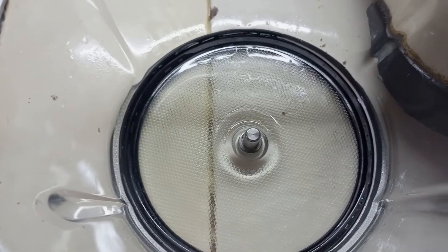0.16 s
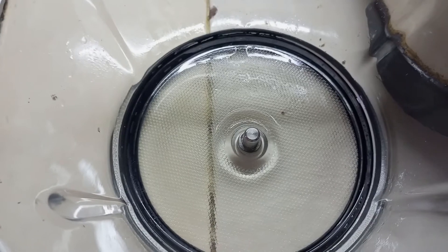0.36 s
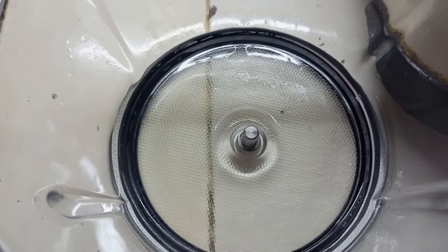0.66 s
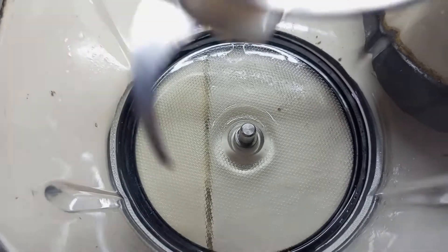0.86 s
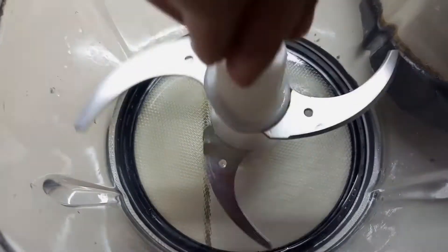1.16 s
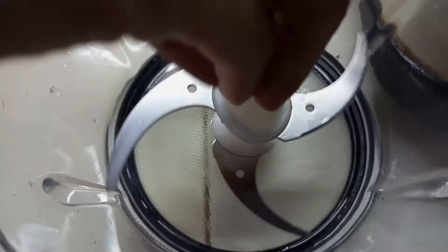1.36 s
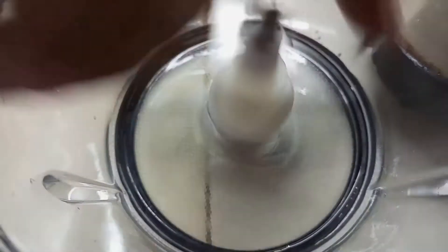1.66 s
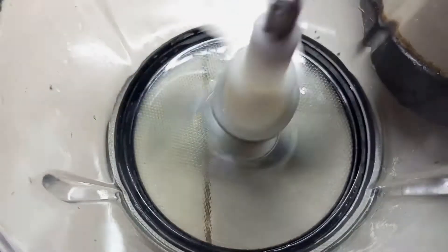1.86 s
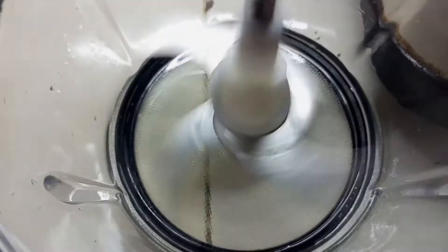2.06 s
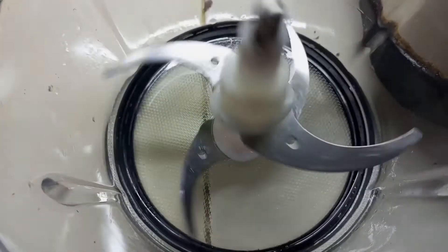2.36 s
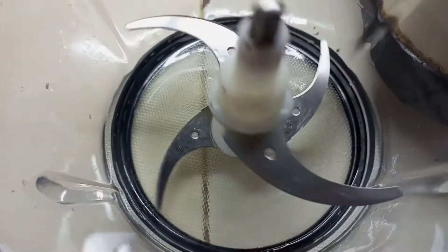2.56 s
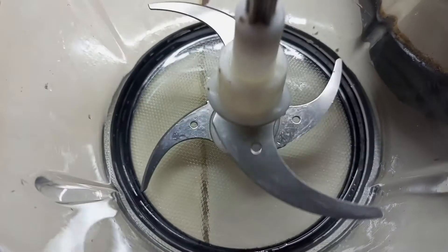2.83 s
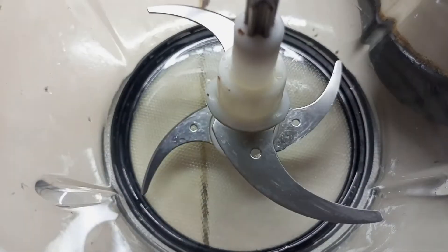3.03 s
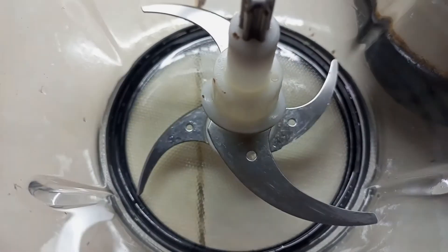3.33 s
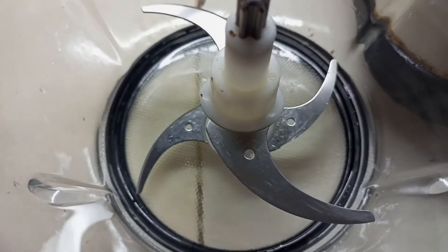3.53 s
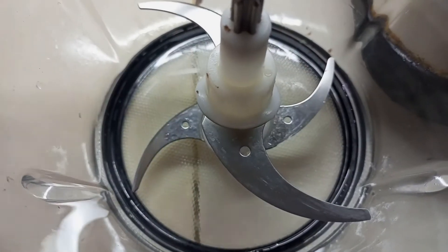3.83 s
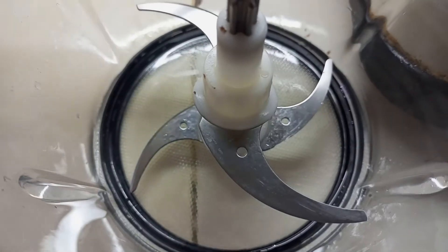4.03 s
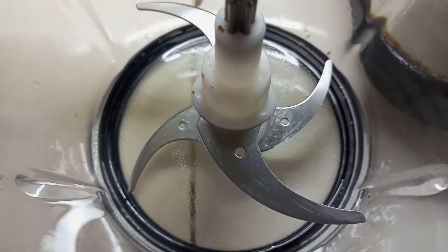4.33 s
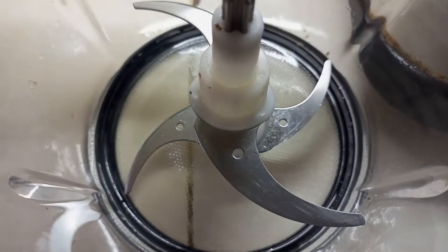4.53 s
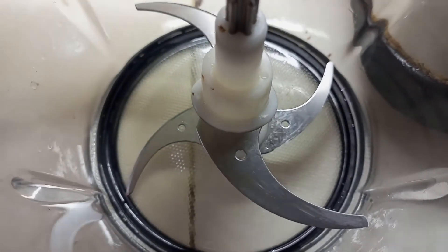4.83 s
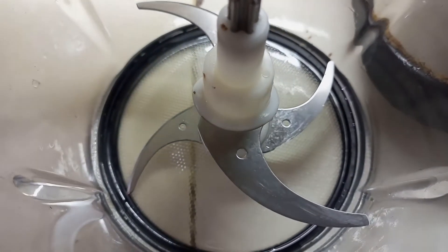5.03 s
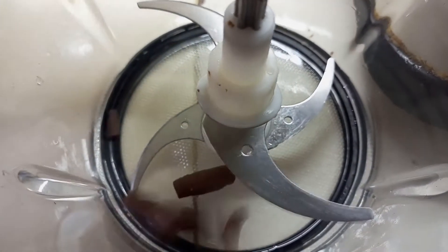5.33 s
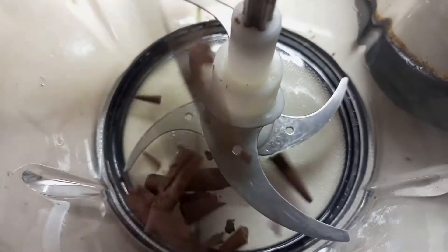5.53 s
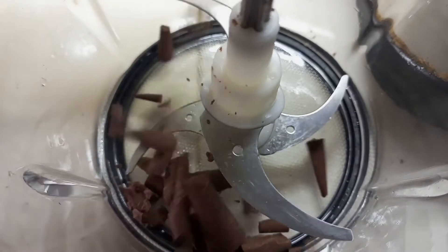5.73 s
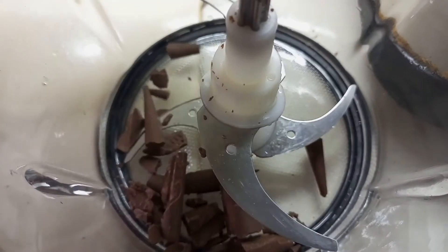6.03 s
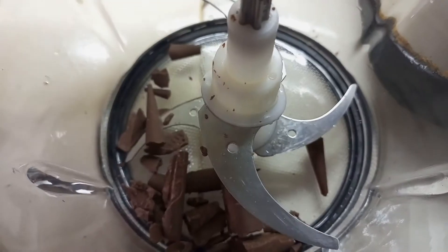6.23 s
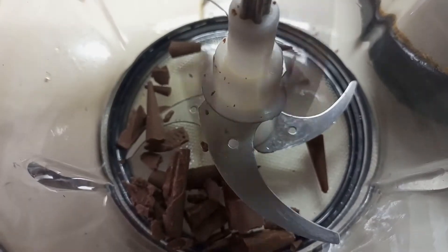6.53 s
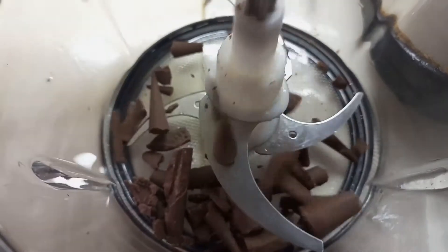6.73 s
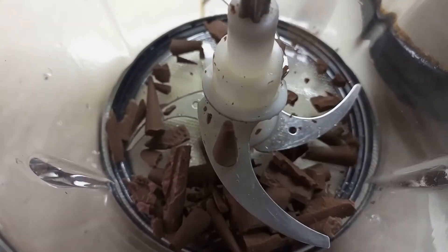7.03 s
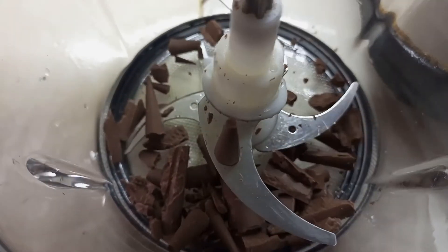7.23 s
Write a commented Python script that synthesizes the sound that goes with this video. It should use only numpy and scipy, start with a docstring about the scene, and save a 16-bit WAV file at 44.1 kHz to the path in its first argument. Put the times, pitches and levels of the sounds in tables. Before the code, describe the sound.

A soft, steady low hum lies under everything, close up in a slightly echoing kitchen. In the first 0.3 s there are faint dull ticks and a scrape, then near quiet. Around 1.5 s a very thin, faint squeak, and at 1.67 s a light plastic click as the blade seats, with small ticks after 2.2 s. From 2.7 to 3.6 s chocolate pieces tick, rub and knock in a glass dish, with bright short clinks. A brief soft shuffle near 3.9 s, then busier clinking from 4.2 to 4.8 s. At 4.92 s a very loud, hard clatter lands in the plastic bowl, crumbs pattering away. More sharp ticks and a ringing clink lead to a second, lesser blow at 5.53 s. Sparse ticks and a knock at 6.0 s. At 6.6 s a scrape and low microphone thump, then at 6.78 s another very loud spill, crunchy, hissing, with muffled bumps until 7.05 s. A few last small clicks.

```python
"""Chocolate pieces into a chopper bowl

Pieces from a glass dish tick as pitched noise bursts; ticks, knocks and touches ring the dish's modes.
Landings are noise bursts that ring the modes of a plastic bowl; pieces rub, scrape and patter as random
grains, with airy hiss above. Microphone thumps are slowing swings, hand rumble is low noise, a squeak is
a sine. Feedback delays add the kitchen's echo; steady noise, strongest near 95 Hz, lies below."""
import sys
import numpy as np
from scipy import signal
from scipy.fft import rfft, irfft, next_fast_len
from scipy.io import wavfile

SR = 44100
rng = np.random.default_rng(int(sys.argv[2]) if len(sys.argv) > 2 else 0)


def unload_audio(sound):
    """Save the sound as a 16-bit wav file, at the path given as the first command line argument."""
    columns = np.transpose(np.atleast_2d(sound))
    # keep every value between -1 and 1, then stretch to whole-number steps
    steps = np.round(np.clip(columns, -1, 1) * 32767)
    wavfile.write(sys.argv[1], SR, steps.astype(np.int16))


def linear_from_db(decibels):
    """Turn decibels (scalar or array-like) into linear amplitude factors; 0 gives 1."""
    return 10 ** (np.asarray(decibels, float) / 20)


N = 325458


def rms_one(x):
    """Scale to unit rms."""
    return x / np.sqrt(np.mean(x ** 2) + 1e-20)


def band(x, low_hz, high_hz):
    """Butterworth band-pass."""
    sos = signal.butter(2, [low_hz, min(high_hz, .45 * SR)], "band", fs=SR, output="sos")
    return signal.sosfilt(sos, x + 1e-18)


def shaped(x, spectrum):
    """x filtered by a spectrum of (Hz, dB per Hz); rms 1."""
    hz, db = np.transpose(spectrum)
    size = next_fast_len(N)
    log_hz = np.log(np.arange(size // 2 + 1) * SR / size + 1)
    gain = linear_from_db(np.interp(log_hz, np.log(hz), db, left=-80, right=-80))
    return rms_one(irfft(rfft(x, size) * gain, size)[:N])


def drift(rate_hz):
    """Slow random curve of rms 1: noise through two equal poles at rate_hz."""
    step = 40  # samples between drawn points
    r = np.exp(-2 * np.pi * rate_hz * step / SR)
    noise = rng.standard_normal(N // step + 2002)
    slow = signal.lfilter([1], [1, -2 * r, r * r], noise)[2000:]
    return np.interp(np.arange(N) / step, np.arange(len(slow)), rms_one(slow))


def ring(x, hz, t60_s):
    """Two-pole resonator: a unit click starts a decaying sine of height 1."""
    r = linear_from_db(-60 / (max(t60_s, .002) * SR))
    w = 2 * np.pi * hz / SR
    return signal.lfilter([0, np.sin(w)], [1, -2 * r * np.cos(w), r * r], x + 1e-18)


def clicks(start_s, sizes):
    """Impulses at the given moments."""
    out = np.zeros(N)
    np.add.at(out, np.round(np.asarray(start_s) * SR).astype(int), sizes)
    return out


def bursts(start_s, levels_db, t60s_s):
    """White noise that starts at once and dies away, one burst a contact."""
    envelope = np.zeros(N)
    for start, level_db, t60_s in zip(start_s, levels_db, t60s_s):
        i = round(start * SR)
        t = np.arange(int(0.99 * abs(t60_s) * SR) + 9) / SR
        envelope[i:i + len(t)] += linear_from_db(level_db - 60 * t / (abs(t60_s) + 1e-4))[:N - i]
    return envelope * rng.standard_normal(N)


def grains(per_s, spread_db):
    """Random tiny impulses of uneven size on a bed of noise."""
    sizes = linear_from_db(spread_db * np.minimum(rng.exponential(1, N), 5)) * rng.choice([-1, 1], N)
    return sizes * (rng.random(N) < per_s / SR) + .15 * rng.standard_normal(N)


def coloured(x, spectrum, patchy_db, rate_hz):
    """Half-octave bands that flicker each on its own, then the spectrum."""
    low_hz, high_hz = spectrum[0][0], spectrum[-1][0]
    edges = low_hz * 2 ** np.arange(0, np.log2(high_hz / low_hz) + .5, .5)
    flicker = sum(linear_from_db(patchy_db * drift(rate_hz)) * band(x, low, high) for low, high in zip(edges, edges[1:]))
    return shaped(flicker, spectrum)


def gains(curves, column):
    """One column of several level curves as a gain in time, near silent between them."""
    t = np.arange(N) / SR
    total = 0
    for rows in curves:
        s, db = np.transpose(rows)[[0, column]]
        total = total + linear_from_db(np.interp(t, s, db, left=-120, right=-120))
    return total


# Dry ticks of pieces. Each row: start in seconds, burst level in dB before filtering, pitch in Hz.
TICK_ROWS = [(0.075, -37.5, 2150), (0.105, -39.5, 327), (0.115, -39.5, 860), (0.144, -42, 1640),
             (0.246, -38, 1450), (0.741, -43, 2300), (1.012, -47, 5530), (1.673, -21.5, 4060),
             (2.188, -28.5, 3944), (2.737, -27, 2670), (2.817, -41, 6230), (2.859, -29, 5400),
             (2.874, -17.5, 4420), (2.936, -43, 6200), (2.952, -33.5, 2930), (2.983, -28.5, 5110),
             (3.016, -25.5, 4510), (3.1, -38.5, 4200), (3.134, -27, 4630), (3.155, -31.5, 6100),
             (3.174, -27.5, 6300), (3.251, -29.5, 4550), (3.286, -35.5, 2230), (3.334, -13, 6230),
             (3.458, -19, 4320), (3.466, -16.5, 3750), (3.505, -19, 3316), (3.549, -37.5, 6350),
             (3.857, -40, 2970), (3.866, -33.5, 2300), (3.916, -34.5, 2980), (3.934, -35, 1520),
             (4.177, -24, 5410), (4.201, -29, 6820), (4.241, -26, 4500), (4.297, -26.5, 3060),
             (4.315, -26, 3740), (4.354, -39.5, 3310), (4.377, -24.5, 6070), (4.388, -13.5, 5680),
             (4.463, -29, 5560), (4.498, -21.5, 5400), (4.54, -13.5, 5400), (4.624, -42, 5000),
             (4.681, -22.5, 1826), (4.714, -28.5, 4480), (4.787, -24.5, 3580), (4.817, -40, 5640),
             (5.144, -27.5, 2480), (5.351, -28, 3990), (5.41, -24.5, 5400), (5.42, -11, 3780),
             (5.446, -16.5, 5140), (5.466, -13.5, 3167), (5.605, -65, 4840), (5.66, -30, 4000),
             (5.725, -33.5, 3890), (5.811, -43, 3780), (5.942, -40, 4440), (6.005, -18, 3340),
             (6.1, -35, 3000), (6.451, -39, 4520), (6.545, -40.5, 5800), (6.581, -16.5, 5570),
             (6.675, -38.5, 6200), (6.882, -20.5, 3330), (7.184, -33.5, 6200), (7.203, -26.5, 5620),
             (7.223, -34.5, 6200), (7.276, -24.5, 2570), (7.312, -43.5, 6220)]
TICK_T60_S, TICK_T60_POWER = 0.051, -0.72  # t60 at 4 kHz; power of pitch by which it changes
SNAP_DB, SNAP_DB_PER_OCTAVE = -26.5, 4  # re burst at 4 kHz, before filtering; higher ticks snap more


def ticks():
    """A dry burst coloured around the pitch of the piece, its brief ping, a faint broad body and an airy snap."""
    length = 4000
    out, snap, t = np.zeros(N), np.zeros(N), np.arange(length) / SR
    for start_s, level_db, hz in TICK_ROWS:
        noise = rng.standard_normal(length)
        pitch = hz / 4000
        t60_s = TICK_T60_S * pitch ** TICK_T60_POWER
        burst = noise * linear_from_db(level_db - 60 * t / t60_s)
        core = linear_from_db(-1.5) * band(band(burst, hz / 1.31, hz * 1.32), hz / 1.34, hz * 1.2)
        ping = linear_from_db(-29.5) * ring(burst, hz, 0.042)
        body = linear_from_db(-6.5) * band(burst, hz / 2.7, hz * 1.55)
        snap_db = level_db + SNAP_DB + SNAP_DB_PER_OCTAVE * np.log2(pitch)
        i = round(start_s * SR)
        out[i:i + length] += (core + ping + body)[:N - i]
        snap[i:i + length] += (noise * linear_from_db(snap_db - 80 * t / t60_s))[:N - i]
    return out + band(snap, 7700, 12000) + linear_from_db(1.5) * band(snap, 14200, 15000)


# Dish modes in five groups struck together. Each row: frequency in Hz, mean level in dB, t60 in seconds.
DISH_MODES = [
    [(5990, -8.5, .15), (6154, -1, 0.093), (6230, 3.5, 0.073), (6380, -14.5, .15), (7280, -23, 0.16),
     (10050, -18, 0.028)],
    [(560, -18, 0.36), (663.4, 6.5, 0.032), (767, -3.5, 0.079)],
    [(748, 2.5, 0.44), (545, -18.5, 0.59)],
    [(1686, -3, .42), (1758, -5, .28), (2934, -18, .13), (3130, -6, .2)],
    [(4430, -4, 0.1), (4510, 6, 0.027), (4440, -1, 0.016)],
]
# Ticks ringing the two treble groups. Each row: group pitch in Hz, level in dB re tick burst,
# loss in dB per octave between tick and group.
TICK_TO_TREBLE = [(6200, -3.5, 40.5), (4500, -11.5, 23)]
# Dull knocks on the dish. Each row: start in seconds, level in dB.
DISH_KNOCKS = [(2.809, -32.5), (2.873, -21), (2.94, -35), (2.983, -50.5), (3.018, -27.5), (3.101, -40.5),
               (3.135, -32), (3.172, -33), (3.232, -31), (3.25, -30), (3.335, -24.5), (3.398, -44),
               (4.212, -39), (4.241, -38), (4.278, -35), (4.297, -22), (4.37, -30), (4.392, -21.5),
               (4.54, -35), (4.555, -33), (4.681, -35), (4.793, -26.5), (5.41, -35.5), (5.467, -34),
               (5.914, -41.5), (6.005, -22), (6.025, -34.5), (6.12, -44), (6.568, -32.5), (6.61, -34),
               (7.222, -36.5), (7.281, -45.5)]
# Touches that leave the dish free to ring; the spot struck favours one of the twins near 1.7 kHz.
# Each row: start in seconds, long low ring in dB, 1.7-3 kHz ring in dB,
# lean in dB (added to the upper twin, taken from the lower).
DISH_TOUCHES = [(2.978, -37, -32.5, 3), (3.172, -30, -33, 7), (3.25, -30.5, -48, 8), (3.347, -31, -43, 4),
                (4.278, -39, -47, 6), (4.37, -43, -38.5, 3), (4.42, -36.5, -48, 5), (4.555, -56, -44, 10),
                (4.681, -59, -49, 0), (4.817, -68, -48, 1.5), (5.445, -32.5, -19.5, -5),
                (5.467, -31.5, -35, -1), (5.526, -34, -24.5, 5), (6.12, -52, -48.5, 9.5),
                (6.61, -68, -42, 1), (6.675, -66, -33, 2), (7.281, -56, -46.5, 10.5), (7.315, -53, -48, -7)]
DISH_FROM_S = 2.5  # the dish comes into the hands; earlier ticks do not ring it


def dish():
    """Ticks, knocks and free touches strike mode groups; rounded contact lets each mode swell for a moment."""
    contact_t60_s = .005
    contact_gain = 2 * np.log(1000) / (contact_t60_s * SR)
    tick_s, tick_db, tick_hz = np.transpose([row for row in TICK_ROWS if row[0] > DISH_FROM_S])
    high, upper = ((tick_s, tick_db + db - loss_db * abs(np.log2(tick_hz / hz)), 0)
                   for hz, db, loss_db in TICK_TO_TREBLE)
    knocks = (*np.transpose(DISH_KNOCKS), 0)
    touch_s, low_db, middle_db, twin_lean_db = np.transpose(DISH_TOUCHES)
    strikes = high, knocks, (touch_s, low_db, 0), (touch_s, middle_db, twin_lean_db), upper
    out = 0
    for modes, (start_s, struck_db, lean_db) in zip(DISH_MODES, strikes):
        for k, (hz, mode_db, t60_s) in enumerate(modes):
            spread_db = 2.5 * rng.standard_normal(len(start_s))
            spot_db = lean_db * ((k == 1) - (k == 0))
            hits = clicks(start_s, linear_from_db(struck_db + mode_db + spot_db + spread_db))
            push = ring(hits, hz, contact_t60_s) * contact_gain
            out = out + ring(push, hz, t60_s)
    return out


# Blows on the plastic bowl, first the blade seated, then pieces landing. Each row: start in seconds,
# contact noise in dB, its low part in dB re that, its treble in dB re that, contact t60 in seconds.
BOWL_BLOWS = [(1.673, -23.5, -7, -5, 0.031), (4.9225, 2, -9, -12.5, 0.05),
              (5.5253, -6.5, -14.5, -27.5, 0.039), (5.5459, -28, -5.5, -27, 0.0377),
              (6.778, 1.5, -31.5, -15.5, 0.054)]
# Bowl modes. Each row: frequency in Hz, relative level in dB, t60 in seconds before drops() shortens it.
BOWL_MODES = [(655.6, -14.5, 0.12), (1096, 7.5, 0.16), (1215, 1.5, 0.25), (1827, -5, 0.46),
              (2400, -8.5, 0.31), (2372, -5, 0.67), (2526, -8.5, 0.75), (2607, -3.5, 0.34),
              (2784, -25.5, 0.52), (3085, -2.5, 0.14), (3690, -11, 0.15), (4790, -9.5, 0.2),
              (5400, -8.5, 0.34), (6350, -17.5, 0.26)]


def drops():
    """A short rough contact rings the bowl's modes and cracks over a broad range."""
    start_s, level_db, low_db, treble_db, t60_s = np.transpose(BOWL_BLOWS)
    low = bursts(start_s, level_db + low_db, t60_s)
    middle = bursts(start_s, level_db, t60_s)
    treble = bursts(start_s, level_db + treble_db, t60_s)
    rung = 0
    for hz, mode_db, mode_t60_s in BOWL_MODES:
        contact = low if hz < 1400 else middle if hz < 4000 else treble
        rung = rung + linear_from_db(mode_db - 30.5) * ring(contact, hz, 0.23 * mode_t60_s)
    crack = linear_from_db(3.0) * band(middle, 1900, 3600)
    crack = crack + linear_from_db(12.5) * band(low, 550, 1100)
    crack = crack + linear_from_db(3.5) * band(treble, 3100, 5900)
    air_snap = band(bursts(start_s, level_db + treble_db - 23.0, .4 * t60_s), 13000, 16300)
    return rung + crack + air_snap


# Pieces sliding and rubbing, one curve per handling. Each row: time in seconds, rub in dB, low scrape in dB.
RUSTLE_CURVES = [
    [(0, -61, -44.5), (0.05, -61.5, -58), (0.119, -59, -46.5), (0.17, -75, -83), (0.25, -87, -54),
     (0.3, -70, -63)],
    [(1.0, -72, -72), (1.03, -56, -73), (1.08, -72, -75)],
    [(1.85, -69, -76), (1.94, -49.5, -75), (1.99, -89, -78)],
    [(2.72, -61, -74), (2.9, -50, -37), (3.0, -52.5, -48.5), (3.1, -57.5, -51), (3.2, -46, -36),
     (3.29, -44, -41), (3.38, -49, -33.5), (3.53, -48.5, -40.5), (3.6, -101, -66)],
    [(3.78, -73, -64.5), (3.84, -56.5, -46), (3.94, -60, -42), (4.0, -66.5, -74)],
    [(4.16, -64.5, -54), (4.3, -47, -41.5), (4.35, -44, -33), (4.41, -37, -43), (4.47, -61, -48.5),
     (4.58, -50, -35.5), (4.65, -67, -76), (4.75, -57, -42.5), (4.86, -63, -61)],
    [(4.92, -64, -29), (4.948, -45.5, -25), (5.06, -40, -56.5), (5.14, -39, -66), (5.19, -47, -61.5),
     (5.25, -64.5, -74.5)],
    [(5.33, -67.5, -85), (5.4, -53.5, -48), (5.5, -38.5, -39.5), (5.58, -56, -42), (5.76, -50.5, -59),
     (5.8, -56, -64), (5.88, -73.5, -64)],
    [(5.97, -64.5, -63), (6.039, -46, -38), (6.09, -85, -58), (6.3, -61, -57.5), (6.42, -70, -82.5),
     (6.47, -53.5, -68)],
    [(6.53, -59, -73), (6.6, -42, -29), (6.661, -43, -34), (6.7, -64.5, -62)],
    [(6.77, -48.5, -50), (6.81, -54.5, -34.5), (6.89, -26.5, -40.5), (6.95, -34.5, -45), (7.03, -50.5, -77),
     (7.08, -62.5, -46)],
    [(7.17, -60, -84.5), (7.242, -59, -47.5), (7.3, -52, -45.5), (7.38, -81.5, -61)],
]
# Rub spectrum. Each row: frequency in Hz, relative density in dB per Hz.
RUB_SPECTRUM = [(1000, -12), (1600, -7), (2300, -6.5), (3200, -2.5), (4200, -9.5), (5600, -7),
                (6800, -13.5), (8000, -30.5), (10000, -59)]
# Scrape spectrum. Each row: frequency in Hz, relative density in dB per Hz.
SCRAPE_SPECTRUM = [(50, -27.5), (100, -31.5), (250, -6), (450, -11.5), (650, 3), (900, -8), (1400, -17)]
# Airy hiss spectrum. Each row: frequency in Hz, relative density in dB per Hz.
HISS_SPECTRUM = [(7000, -19), (8500, -6.5), (10000, -9.5), (12600, -8.5), (15200, -4.5), (16100, -10.5)]
# Short airy swishes, some perhaps foil. Each row: middle in seconds, level in dB,
# half length in seconds (to 1/e).
AIRY_SWISHES = [(2.197, -54, 0.009), (2.902, -73, 0.057), (3.371, -59, 0.032), (3.53, -61, 0.031),
                (3.894, -100, .06), (4.24, -70, 0.033), (4.41, -61.5, 0.063), (4.558, -72, .06),
                (6.601, -55, 0.022), (6.911, -45.5, 0.033), (7.21, -68.5, 0.034)]
HISS_DB = -35.5  # hiss of the rubbing re its level
# Crumbs scatter after each landing: level re contact noise, rise time constant, decay.
TUMBLE_DB, TUMBLE_RISE_S, TUMBLE_T60_S = -18, 0.0063, 0.25


def rustle():
    """Pieces tumble and rub in dense grains, with a dull scrape under them and thin airy hiss above."""
    t = np.arange(N) / SR
    busy = gains(RUSTLE_CURVES, column=1)
    for start_s, level_db, *_ in BOWL_BLOWS[1:]:
        since = np.maximum(t - start_s, 0)
        rise = 1 - np.exp(-since / TUMBLE_RISE_S)
        busy = busy + linear_from_db(level_db + TUMBLE_DB - 60 * since / TUMBLE_T60_S) * rise
    hiss_gain = linear_from_db(HISS_DB) * busy
    for middle_s, db, half_s in AIRY_SWISHES:
        hiss_gain = hiss_gain + linear_from_db(db) * np.exp(-((t - middle_s) / half_s) ** 2)
    pinging = shaped(pings(2400, 150.0, count=18), RUB_SPECTRUM)
    grainy = coloured(grains(2500, 2.8), RUB_SPECTRUM, patchy_db=5.5, rate_hz=41)
    rub = busy * linear_from_db(2.1 * drift(27)) * rms_one(pinging + linear_from_db(-4.5) * grainy)
    dull = coloured(grains(250, 3.4), SCRAPE_SPECTRUM, patchy_db=7.0, rate_hz=8.0)
    scrape = gains(RUSTLE_CURVES, column=2) * dull
    hiss = hiss_gain * linear_from_db(0.93 * drift(30)) * shaped(grains(4000, 3.0), HISS_SPECTRUM)
    return rub + patter(busy) + scrape + hiss


def pings(per_s, t60_cycles, count):
    """Tumbling crumbs: random clicks dealt to small resonators spread in pitch."""
    hits, dealt = grains(per_s, 3.0), rng.integers(0, count, N)
    pitches_hz = np.geomspace(1000, 8500, count) * linear_from_db(.3 * rng.standard_normal(count))
    return sum(ring(hits * (dealt == k), hz, t60_cycles / hz) * np.sqrt(hz) for k, hz in enumerate(pitches_hz))


PATTER_PER_S, PATTER_DB, PATTER_T60_S = 1000, -14.5, 0.07  # crumbs tapping the bowl, which they also damp


def patter(busy):
    """Crumbs tap the bowl at random spots, each ringing only some of its upper modes."""
    taps = busy * band(grains(PATTER_PER_S, 3.02), 1500, 6500)
    spots = rng.integers(0, 2 ** 20, N // 64 + 1).repeat(64)[:N]  # bit k: mode k rings
    out = 0
    for k, (hz, mode_db, _) in enumerate(BOWL_MODES):
        if hz > 1400:
            out = out + linear_from_db(PATTER_DB + mode_db) * ring(taps * (spots >> k & 1), hz, PATTER_T60_S)
    return out


# Low thumps at the microphone. Each row: start in seconds, swing level in dB before filtering.
MIC_THUMPS = [(6.643, -7.5), (6.828, -13.5), (6.832, -24), (6.862, -27), (6.88, -23.5), (6.912, -30),
              (6.927, -24.5), (6.951, -25), (6.955, -20.5), (6.991, -9.5), (7.001, -20), (7.015, -13.5),
              (7.062, -31.5)]
FIRST_TURN_HZ = 550  # the first full swing lasts 1/550 s


def thumps():
    """A sharp dip, then ever slower swings."""
    turns = np.sqrt(np.arange(1500) / SR * FIRST_TURN_HZ)  # the swing slows as it dies
    swing = -np.sin(2 * np.pi * turns) * np.exp(-.55 * turns ** 2)
    start_s, level_db = np.transpose(MIC_THUMPS)
    return band(signal.fftconvolve(clicks(start_s, linear_from_db(level_db)), swing)[:N], 41, 1980)


# The table top shakes under the hands, in curves. Each row: time in seconds, mean level in dB.
RUMBLE_CURVES = [
    [(2.75, -69), (2.806, -81), (2.88, -62), (3.404, -61.5), (3.862, -71), (3.904, -52), (4.1, -63)],
    [(6.55, -72.5), (6.614, -73), (7.032, -35.5), (7.2, -76)],
]


def rumble():
    """Lumpy low noise while the hands press on the table."""
    low = rms_one(band(band(rng.standard_normal(N), 60, 130), 60, 130))
    return gains(RUMBLE_CURVES, column=1) * linear_from_db(0.74 * drift(7.3)) * low


# A faint squeak: middle in seconds, half length in seconds (to 1/e), pitch in Hz, mean level in dB.
SQUEAK_TONE = (1.51, 0.09, 3150, -68)


def squeak():
    """A thin sine of slightly unsteady level that swells and fades."""
    middle_s, half_s, hz, db = SQUEAK_TONE
    t = np.arange(N) / SR
    swell = np.exp(-((t - middle_s) / half_s) ** 4)
    return linear_from_db(db + 2.5 * drift(15)) * swell * np.sin(2 * np.pi * hz * t)


KITCHEN_T60_S, WALL_CUT_HZ, KITCHEN_DB = 0.26, 8400, -20  # t60 at low pitch; loss per round; send level


def kitchen(x):
    """Eight feedback delays, duller on every round."""
    size = next_fast_len(N + SR)
    w = 2 * np.pi * np.arange(size // 2 + 1) / size
    dull = 1 / (1 + 1j * w * SR / (2 * np.pi * WALL_CUT_HZ))
    echo = 0
    for k, lag_s in enumerate(np.geomspace(.009, .031, 8)):
        loop = linear_from_db(-60 * lag_s / KITCHEN_T60_S) * dull * np.exp(-1j * w * lag_s * SR)
        echo = echo + (-1) ** k * loop / (1 - loop)
    return irfft(rfft(x, size) * echo, size)[:N]


# Background spectrum. Each row: frequency in Hz, relative density in dB per Hz.
AIR_SPECTRUM = [(25, -24), (62, -14.5), (95, 1), (150, -8.5), (400, -15.5), (520, -7.5), (650, -17.5),
                (1200, -19), (2500, -19.5), (3300, -23), (5000, -34.5), (8000, -42.5), (16500, -43)]
AIR_DB = -56.5  # mean level


def air():
    """Steady coloured noise whose level wavers slightly."""
    return linear_from_db(AIR_DB + .5 * drift(4.5)) * shaped(rng.standard_normal(N), AIR_SPECTRUM)


def scene():
    """All sources near one microphone."""
    high_pass = signal.butter(4, 260, "high", fs=SR, output="sos")
    near = signal.sosfilt(high_pass, ticks() + dish() + drops())
    echo = linear_from_db(KITCHEN_DB) * kitchen(near)
    return (near + echo + rustle() + thumps() + rumble() + squeak() + air())[None]


def top_cut(x):
    """Nothing passes above the cut-off."""
    return signal.sosfilt(signal.butter(12, 16420, fs=SR, output="sos"), x)


def record(dry):
    """The hardest blows overload: clipped at full scale."""
    mix = np.clip(dry, -1, 1)
    return top_cut(mix)


dry = scene()
out = record(dry)
unload_audio(out)
```